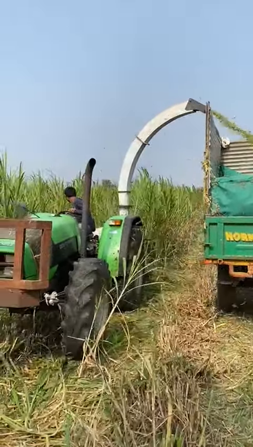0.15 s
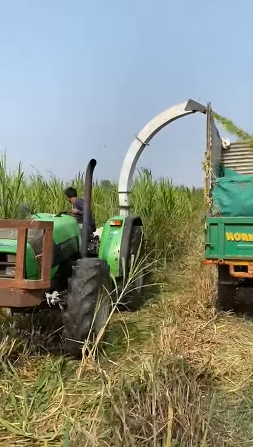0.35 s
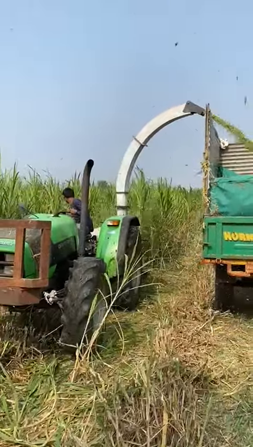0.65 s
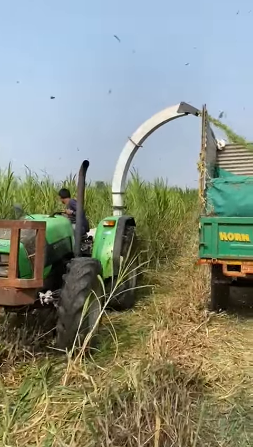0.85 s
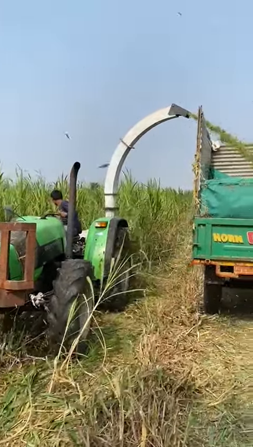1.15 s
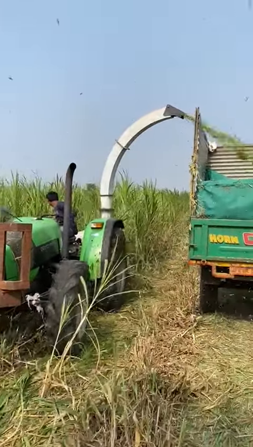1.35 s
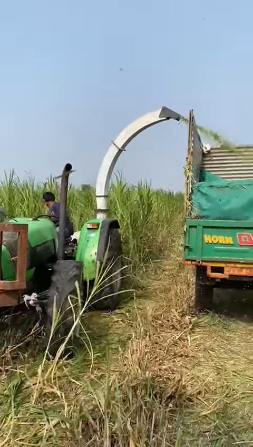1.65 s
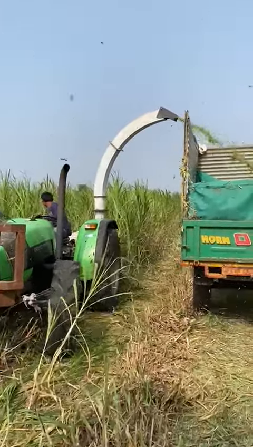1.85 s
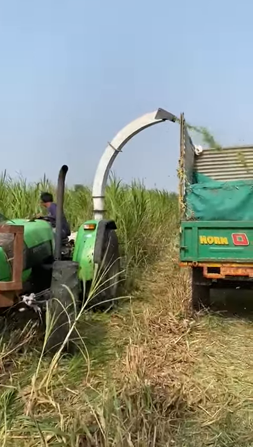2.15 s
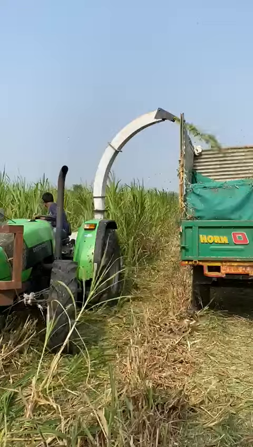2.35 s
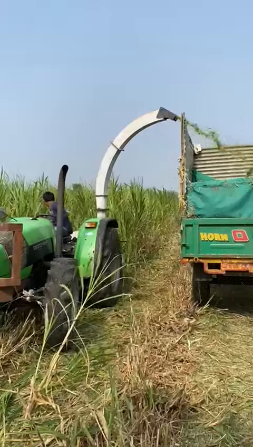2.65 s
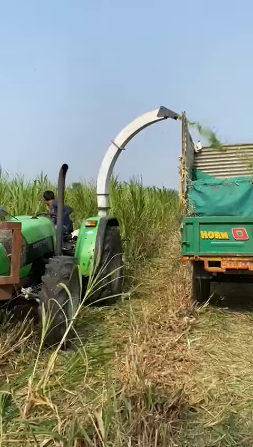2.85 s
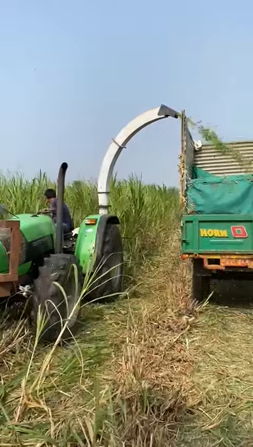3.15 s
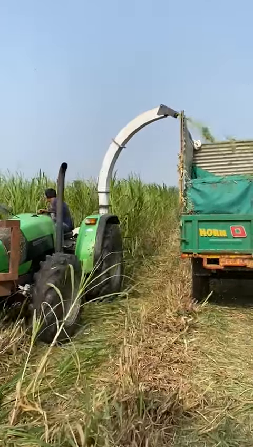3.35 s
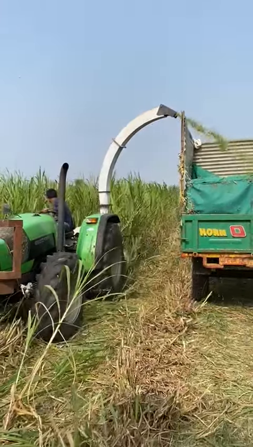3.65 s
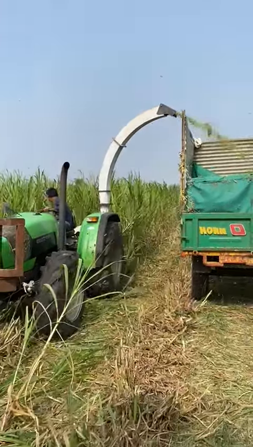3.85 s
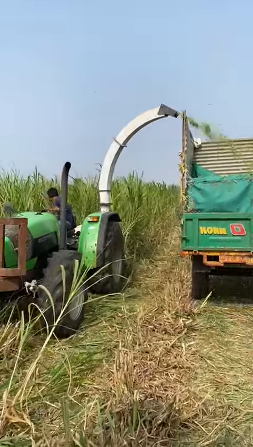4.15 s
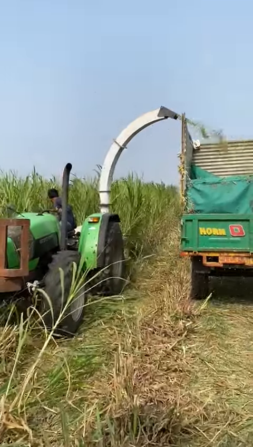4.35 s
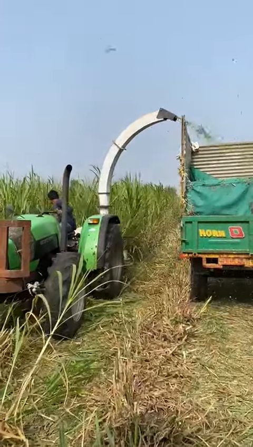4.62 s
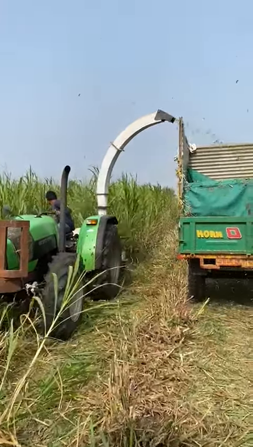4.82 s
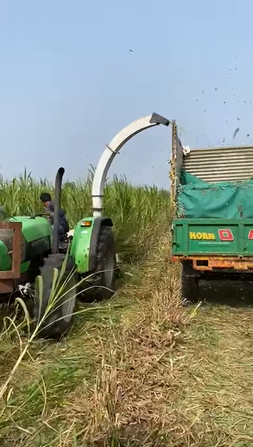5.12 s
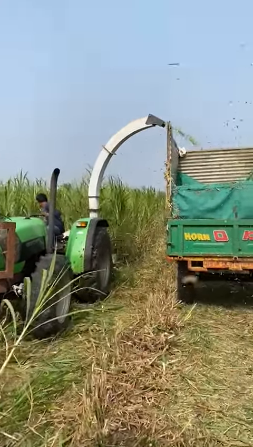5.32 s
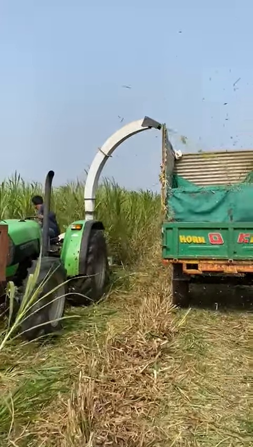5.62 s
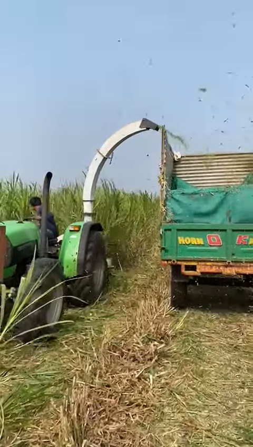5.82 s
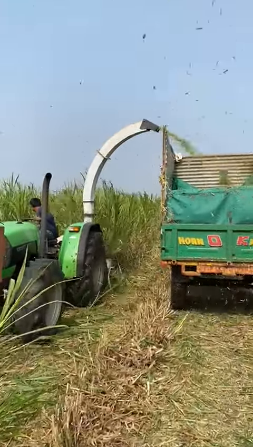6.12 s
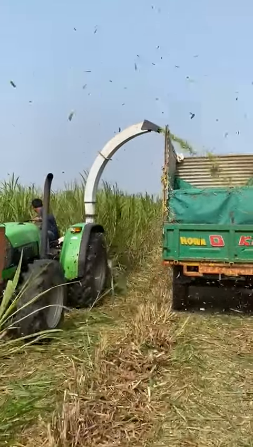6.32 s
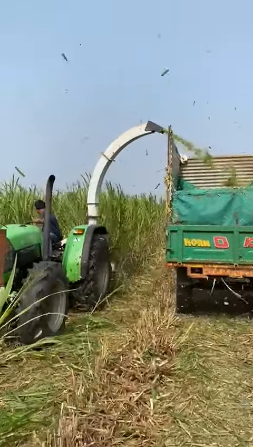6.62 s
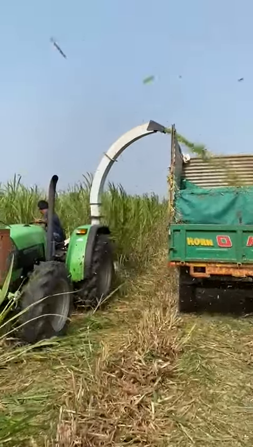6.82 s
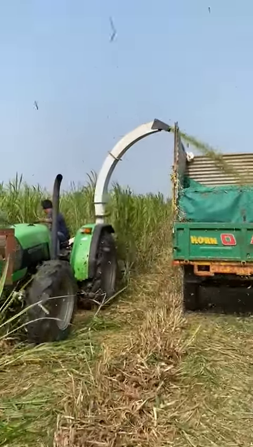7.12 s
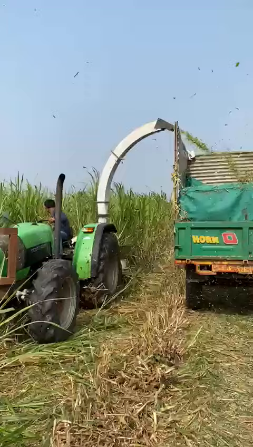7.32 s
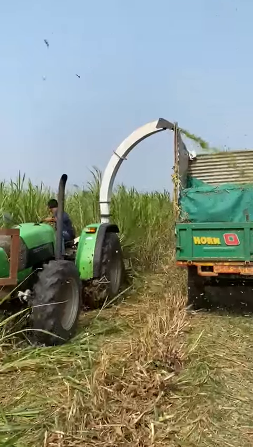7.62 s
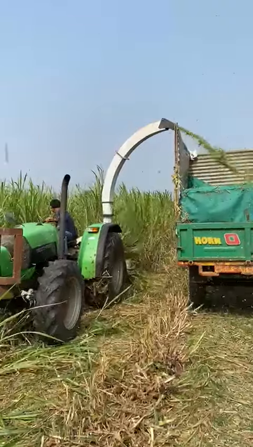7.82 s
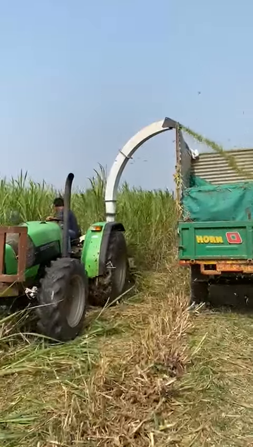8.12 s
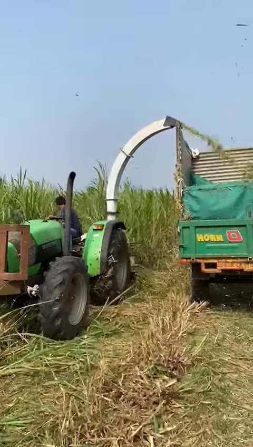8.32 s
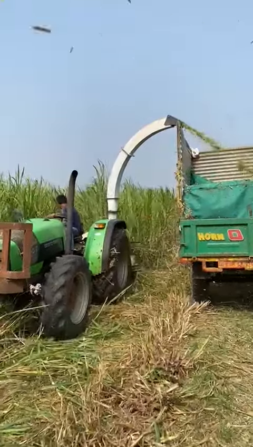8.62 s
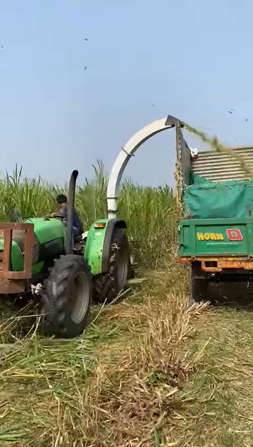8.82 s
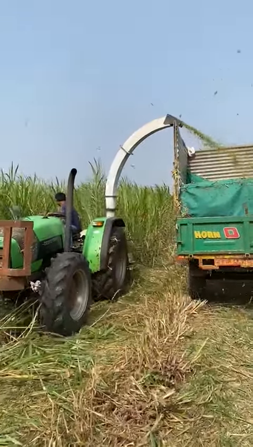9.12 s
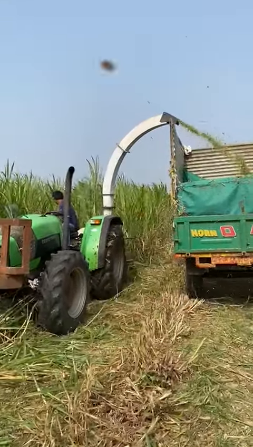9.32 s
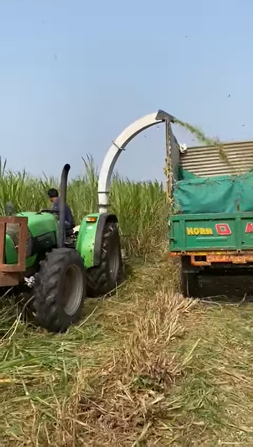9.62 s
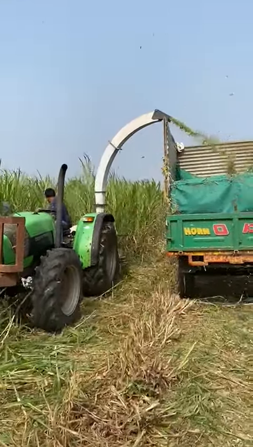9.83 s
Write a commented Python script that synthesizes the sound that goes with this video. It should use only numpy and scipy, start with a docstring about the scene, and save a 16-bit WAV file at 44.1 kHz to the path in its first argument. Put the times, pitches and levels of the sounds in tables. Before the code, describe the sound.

A diesel tractor runs under load a few metres away in an open field, its pitch easing and sagging slightly as its exhaust beats against a second tractor. Throughout, a forage harvester chops grass in lumpy surges, a blower hisses and chaff rattles up a metal spout. Hard stalks crack and knock in clusters, early on, near the middle and again about two thirds through.

```python
"""An open field of tall grass, a few metres from a four-cylinder diesel tractor and its forage harvester.
The engine eases and sags with the crop, and its exhaust beats against a second one hauling the trailer.
Knives chop the stalks in surges, loose bits tap the guards, and a blower hisses.
Chaff rattles up a ringing sheet-metal spout, where hard stalks crack and knock."""
import sys
import numpy as np
from scipy import signal
from scipy.fft import rfft, irfft, next_fast_len
from scipy.io import wavfile

SR = 44100
rng = np.random.default_rng(int(sys.argv[2]) if len(sys.argv) > 2 else 0)


def int16_out(signal):
    """Quantize to a 16-bit WAV file."""
    q = np.round(np.clip(np.atleast_2d(signal).T, -1, 1) * 32767)
    wavfile.write(sys.argv[1], SR, q.astype(np.int16))


N = 439677
T = np.arange(N) / SR
FFT_SIZE = next_fast_len(N)
HZ = np.fft.rfftfreq(FFT_SIZE, 1 / SR)

# The near tractor's speed. Each row: time in seconds, firings per second.
TRACTOR_SPEED = [(0, 68.1), (0.85, 66.45), (1.3, 66.75), (2.15, 66.95), (2.6, 67.7), (3.3, 68.35),
                 (3.95, 69.0), (5.0, 71.75), (5.35, 72.45), (5.8, 72.6), (6.2, 72.3), (6.9, 70.7),
                 (7.45, 70.6), (9.1, 68.75), (9.7, 69.0)]
# Its exhaust tones at 1, 2, 3 (the boom) and 8 times the firing rate.
# Each row: time in seconds, level in dB.
FIRING_TONE = [(0, -30), (2.2, -30), (3.7, -27.5), (4.3, -30.5), (5.8, -30), (6.7, -33.5), (8.2, -32),
               (8.75, -28), (9.8, -34.5)]
SECOND_TONE = [(0, -37.5), (4.5, -39), (6.3, -32), (7.7, -32), (8.5, -34.5), (9.97, -32.5)]
BOOM_TONE = [(0, -30), (0.45, -23.5), (1.6, -28.5), (3.8, -24), (4.85, -30.5), (6.6, -24), (7.9, -27),
             (8.75, -26), (9.97, -31.5)]
EIGHTH_TONE = [(0, -36), (.8, -37.5), (1.6, -47), (2.0, -35), (2.6, -37), (3.0, -45), (3.8, -51),
               (4.15, -35.5), (4.9, -35.5), (5.8, -38), (6.3, -48), (8.6, -47), (9.2, -39), (9.97, -45)]
# Its other tones; the quarter multiples come from unequal cylinders.
# Each row: multiple of the firing rate, level in dB before the pipe lifts it.
TRACTOR_TONES = [(.75, -47.5), (1.25, -47), (1.5, -44.5), (3.75, -48), (4, -33), (4.25, -51), (5, -43.5),
                 (6, -47.5), (7, -45.5), (9, -48), (10, -45.5), (12, -50)]
# Exhaust pipe resonances. Each row: centre in Hz, width in Hz, lift in dB.
PIPE_MODES = [(267, 5.3, 3), (289.1, 10.5, 8.3), (362, 6, 5), (435, 8, 6), (465, 4, 6), (479, 11, 9),
              (615, 10, 7), (850, 30, 6)]
# The hauling tractor's near-steady speed. Each row: time in seconds, firings per second.
HAULER_SPEED = [(0, 68.5), (1.3, 68.4), (4.0, 68.4), (5.4, 68.85), (7.3, 68.5), (9.97, 68.3)]
# Its exhaust tones. Each row: multiple of the firing rate, dB against the hauler's level.
HAULER_TONES = [(.75, -19), (1, -8), (1.75, -9), (2, 1.7), (2.25, -13), (2.5, -19), (4.25, -14.5),
                (5.25, -11.5), (6, -17), (10, -9.5), (10.5, -15.5)]
# Two faint whines. Each row: time in seconds, lower whine in dB, higher whine in dB.
WHINE_LEVELS = [(0, -35.5, -56), (2.6, -42, -56), (3.3, -41.5, -47), (4.8, -41, -43.5), (5.4, -43, -56),
                (6.5, -47, -56), (9.97, -47, -54)]
# The machinery's roar and the blower's hiss. Each row: time in seconds, level in dB.
ROAR_LEVEL = [(0.05, -27), (0.42, -29), (3.45, -29.5), (4.8, -31.5), (5.42, -27.5), (5.61, -27.5),
              (9.09, -27.5), (9.6, -27.5)]
BLOWER_LEVEL = [(0.1, -46), (0.6, -48.1), (1.2, -48.5), (1.9, -45.6), (2.4, -49), (3.3, -46.5),
                (4.8, -50.5), (5.05, -46.6), (5.45, -44.5), (5.7, -45), (7.45, -46), (7.7, -43.5),
                (9.05, -45.5), (9.65, -48), (9.9, -47)]
# Even flow of crop through the knives. Each row: time in seconds, flow level in dB.
EVEN_FEED = [(0, -28), (1.1, -29), (2.25, -27.5), (2.7, -29.5), (3.4, -28), (4.35, -29), (4.75, -30.5),
             (5.2, -29.5), (6.4, -26.5), (7.15, -29), (7.55, -28.5), (8.65, -27), (9.4, -28.5), (9.97, -29)]
# Thick wads of grass on top of that flow.
# Each row: start in seconds, hold in seconds, extra dB at the knives, extra dB at the spout.
GRASS_WADS = [(0.79, 0.041, 1.5, 0), (1.177, 0.96, 2.5, 0.5), (1.52, 0.073, 1, 3.5),
              (3.117, 0.047, 0.5, 2.5), (3.51, 0.13, 2, 2), (3.937, 0.081, 2.5, 3), (4.215, 0.1, 3, 1),
              (6.537, 0.06, 3, 2), (6.713, 0.5, 3, 1), (6.735, 0.14, 1.5, -1), (7.96, .08, 1.5, 2.5)]
# Tone colour of roar, knives, blower and cracking stalks. Each row: frequency in Hz, relative level in dB.
ROAR_EQ = [(20, -23), (40, -22), (55, -16), (85, -1.5), (110, -15.5), (160, 3.5), (250, -1), (390, 2.5),
           (490, -0.9), (600, 2), (710, -1.3), (790, -4.5), (1400, -11.5), (2600, -11.5), (3300, -19.5),
           (6000, -24), (12000, -100)]
CHOP_EQ = [(300, -20), (700, -3), (1000, 1), (1400, 0), (1900, -2), (2250, -5), (2500, -9), (3300, -15),
           (4200, -15), (5500, -21), (6000, -21), (9000, -36), (12000, -42)]
BLOWER_EQ = [(1000, -9), (2200, 1), (2800, 9), (3400, 5), (4500, 6), (5200, 7.5), (6600, 6), (8000, 3.3),
             (9200, -.5), (11000, .3), (12000, -2.5)]
CRACK_EQ = [(600, -14), (1200, -1), (1900, 1), (2600, -8), (3300, -14), (5500, -14), (8000, -25),
            (12000, -40)]
# Spout resonances: soft chaff rings the low ones, coarse pieces reach the high ones.
# Each row: centre in Hz, width in Hz, relative level in dB.
SPOUT_LOW_MODES = [(1400, 200, -11), (2165, 150, 0)]
SPOUT_HIGH_MODES = [(3650, 350, -8), (4150, 280, 0), (5000, 250, -3)]
# Hard stalks, each striking its own part of the spout.
# Each row: start in seconds, ring in dB, crack in dB before its EQ, knock in dB, knock pitch in Hz.
STALK_HITS = [(0.1456, -35, -33, -38, 4180), (1.183, -26, -37, -42, 4200), (1.205, -30, -31, -42, 4080),
              (1.352, -38, -28, -37, 4170), (1.468, -37, -46, -37.5, 4100), (1.495, -28, -39, -38, 4180),
              (1.54, -32, -41, -36, 4350), (1.575, -29, -36, -38, 4200), (1.617, -30, -39, -40, 4150),
              (1.745, -38, -48, -36, 4100), (1.766, -30, -44, -40, 4280), (1.815, -27, -46, -41, 4050),
              (1.86, -30, -34, -39, 4300), (1.879, -27, -31, -33, 4080), (1.905, -29, -34, -40, 4200),
              (1.982, -26, -48, -38, 4250), (2.068, -29, -28, -43, 5050), (2.15, -28, -44, -50, 4200),
              (3.13, -44, -43, -37, 4180), (3.553, -32, -46, -44, 4300), (3.585, -38, -38, -52, 4200),
              (3.624, -32, -46, -52, 4200), (3.937, -23, -31.5, -38, 5000), (3.972, -33, -42, -46, 4200),
              (4.045, -30, -48, -45, 4200), (4.209, -28, -31.5, -32.5, 4140), (4.253, -37, -36, -46, 5000),
              (4.439, -31, -40, -39, 4250), (5.42, -42, -31, -33, 4130), (5.441, -32, -34, -39, 4750),
              (5.523, -44, -48, -39, 5230), (6.04, -28, -45, -46, 4100), (6.448, -35, -38, -32, 4000),
              (6.5685, -34, -45, -42, 4400), (6.742, -25, -27, -35, 4380), (6.761, -33, -37, -37, 5650),
              (6.797, -36, -32, -40, 4450), (6.866, -32, -29, -34.5, 4330), (7.034, -29, -34, -48, 4200),
              (7.108, -35, -39, -39, 5200), (7.162, -34, -39, -46, 4300), (7.32, -33, -38, -50, 4200),
              (7.97, -29, -36, -44, 4200), (8.24, -34, -41, -46, 4200), (8.998, -33, -41, -46, 4200)]
# Stereo width. Each row: frequency in Hz, likeness of left and right from 0 to 1.
STEREO_LIKENESS = [(60, .8), (150, .8), (300, .86), (600, .95), (800, .9), (1100, .95), (1750, .998),
                   (2550, .99), (2850, .7), (3350, .1), (3950, .52), (4550, .26), (4720, .72), (5000, .92),
                   (5300, .965), (5560, .87), (5750, .68), (6200, .68), (6600, .995), (8200, .995),
                   (8900, .42), (9600, .995)]
# Stereo phase. Each row: frequency in Hz, lead of the left side in radians.
LEFT_LEAD = [(300, 0), (800, -.25), (1100, -.05), (1400, 0), (2600, 0), (3100, -.7), (3600, 1), (4400, 1.6),
             (4700, .05), (5150, 0), (5600, .4), (6200, 2), (6450, 3.1), (8200, 3.2), (8800, 3.8),
             (9100, 5.9), (9600, 6.28)]
# Stereo balance. Each row: frequency in Hz, left minus right in dB.
BALANCE = [(250, 0), (500, -2), (700, -.6), (900, -4.3), (1100, -2.6), (1800, 0), (2200, .4), (2550, -.5),
           (2800, -3.6), (3100, -4.3), (3400, -1.8), (4100, -1.7), (4550, -2.4), (5000, 0)]


def amp(db):
    """Decibels to gain."""
    return 10 ** (np.asarray(db) / 20)


def unit(x):
    """Scales to rms 1."""
    return x / np.sqrt(np.mean(x ** 2) + 1e-20)


def curves(rows):
    """Each column after the first as a curve over time."""
    s, *columns = np.transpose(rows)
    return [np.interp(T, s, c) for c in columns]


def over_hz(points):
    """Joins points on a log-frequency axis."""
    hz, value = np.transpose(points)
    return np.interp(np.log(HZ + 1), np.log(hz + 1), value)


def wander(rate_hz, size=4096):
    """Smooth random drift of rms 1, up to about the given rate."""
    lowpass = 1 / (1 + (np.fft.rfftfreq(size, T[-1] / size) / rate_hz) ** 4)
    slow = irfft(rfft(rng.standard_normal(size)) * lowpass)
    return unit(np.interp(T, np.linspace(0, T[-1], size), slow))


def impacts(per_s, spread_db):
    """Two unrelated trains of random clicks of uneven size."""
    size = amp(spread_db * rng.exponential(1, (2, N)).clip(0, 4))
    return unit(size * rng.standard_normal((2, N)) * (rng.random((2, N)) < per_s / SR))


def colour(x, gain, lo_hz, hi_hz):
    """Spectrum of x through an EQ that gives unit noise an rms of 1 within the band."""
    share = np.mean(gain ** 2 * (HZ > lo_hz) * (HZ < hi_hz))
    return rfft(x, FFT_SIZE) * gain / np.sqrt(share)


def crank(rate_hz, jitter):
    """Running count of cycles at a speed that trembles slightly."""
    return np.cumsum(rate_hz * (1 + jitter * wander(8.9))) / SR


def pipe_db(hz):
    """The exhaust pipe lifts any tone that the speed carries into one of its resonances."""
    return sum(db / (1 + (2 * (hz - centre) / width) ** 2) for centre, width, db in PIPE_MODES)


def exhaust(firings, tones, rough, fading=0.11):
    """Tones locked to the four-stroke cycle; combustion varies, and the higher ones fade in and out."""
    out = np.zeros(N)
    for multiple, db in tones:
        fade_db = fading * multiple * wander(1.0)
        out += amp(db + fade_db) * np.sqrt(2) * np.cos(2 * np.pi * (multiple * firings + rng.random()))
    return out * (1 + rough * wander(64))


def tractor():
    """The near diesel booms through its pipe; returns the sound and the firing count."""
    rate = curves(TRACTOR_SPEED)[0]
    firings = crank(rate, jitter=.0013)
    tones = [(multiple, db + pipe_db(multiple * rate)) for multiple, db in TRACTOR_TONES]
    for multiple, levels in (1, FIRING_TONE), (2, SECOND_TONE), (3, BOOM_TONE), (8, EIGHTH_TONE):
        tones.append((multiple, curves(levels)[0]))
    return exhaust(firings, tones, rough=0.08), firings


def hauler(start_db=-31.5, rise_db_per_s=0.2755):
    """The second, rougher exhaust swells slowly, close enough in pitch to beat against the first."""
    firings = crank(curves(HAULER_SPEED)[0], jitter=0.0011)
    return amp(start_db + rise_db_per_s * T) * exhaust(firings, HAULER_TONES, rough=0.18)


def whines(pitches_hz=(321.5, 803)):
    """Two faint, wavering tones among the machines."""
    return sum(amp(db + wander(1.5)) * np.sqrt(2) * np.sin(2 * np.pi * crank(hz, jitter=0.0022))
               for hz, db in zip(pitches_hz, curves(WHINE_LEVELS)))


def roar(firings, firing_depth=0.045, cycle_depth=0.029):
    """Combustion and gear noise, throbbing with each firing and each four-stroke cycle."""
    throb = 1 + firing_depth * np.cos(2 * np.pi * firings) + cycle_depth * np.cos(np.pi * firings / 2)
    level = amp(curves(ROAR_LEVEL)[0] + 0.38 * wander(30))
    return colour(rng.standard_normal((2, N)) * unit(throb) * level, amp(over_hz(ROAR_EQ)), 380, 780)


def crop_flow(attack_s=0.0099, release_s=0.014, spout_offset_db=-6):
    """Flow in dB at the knives and at the spout: each wad bites quickly, holds and clears."""
    chopping = drumming = curves(EVEN_FEED)[0]
    for start, hold, chop_db, drum_db in GRASS_WADS:
        bite = np.clip((T - start) / attack_s, 0, 1)
        wad = bite * np.exp(-np.maximum(T - start - hold, 0) / release_s)
        chopping = chopping + chop_db * wad
        drumming = drumming + drum_db * wad
    return chopping, drumming + spout_offset_db


def crop_gain(flow_db, empty_db):
    """Gain of what the crop adds to the sound of the empty machine; it never quite falls silent."""
    added = amp(flow_db) ** 2 - amp(empty_db) ** 2
    return np.sqrt(np.maximum(added, amp(empty_db) ** 2 / 10))


def chopper(flow_db):
    """Thousands of stalks snap under the knives, in lumpy surges."""
    level = crop_gain(flow_db, empty_db=-32) * amp(-2 + 1.86 * wander(13))
    snaps = impacts(per_s=8000, spread_db=1) * level
    return colour(snaps, amp(over_hz(CHOP_EQ)), 900, 2000)


def panels(flow_db, taps_per_s=300, t60_s=.08, low_hz=800, high_hz=2800, trim_db=-6.5):
    """Loose bits of crop tap guards and covers, each at its own pitch; the high ones ring more softly."""
    t = T[:SR // 12]
    decay = amp(-60 * t / t60_s)
    taps = np.zeros((2, N + len(t)))
    for train in taps:
        for when, pitch, size in rng.random((round(taps_per_s * T[-1]), 3)):
            hz = low_hz * (high_hz / low_hz) ** pitch
            start = int(when * N)
            strength = np.sign(size - .5) * (1 + abs(2 * size - 1)) / (1 + (hz / 2100) ** 4)
            train[start:start + len(t)] += strength * decay * np.sin(2 * np.pi * hz * t)
    return rfft(unit(taps[:, :N]) * crop_gain(flow_db, empty_db=-36) * amp(trim_db), FFT_SIZE)


def reflections(strength=0.29, longest_s=.028, dull_hz=3000, count=12):
    """Ground, bodywork and trailer wall send back short, dull echoes that ripple the noise spectrum."""
    delays = rng.uniform(longest_s / 10, longest_s, count)
    echoes = np.exp(-2j * np.pi * delays[:, None] * HZ).sum(0) / np.sqrt(count)
    returned = strength / (1 + (HZ / dull_hz) ** 2)
    return (1 + returned * echoes) / np.sqrt(1 + returned ** 2)


def blower(gust_db=0.6):
    """Air and fine chaff rush out of the spout in small gusts."""
    level = amp(curves(BLOWER_LEVEL)[0] + gust_db * wander(22))
    rush = impacts(per_s=22000, spread_db=-2) * level
    return colour(rush, amp(over_hz(BLOWER_EQ)), 8800, 11300)


def spout_wall(x, modes, lo_hz, hi_hz, dull_hz=5230):
    """Spectrum of x ringing in the sheet metal, which radiates little above dull_hz."""
    gain = sum(amp(db) / (1 + 1j * (HZ ** 2 - hz ** 2) / (width * HZ + 1e-9)) for hz, width, db in modes)
    gain = gain / (1 + (HZ / dull_hz) ** 6)
    return colour(x, abs(gain), lo_hz, hi_hz) * np.exp(1j * np.angle(gain))


def spout(flow_db, soft_db=-3, rasp_db=-9):
    """Chaff drums on the spout wall, and coarse pieces rasp on it in flurries."""
    drumming = crop_gain(flow_db, empty_db=-36)
    soft = impacts(per_s=2400, spread_db=-1.5) * drumming * amp(soft_db + 2 * wander(26))
    coarse = impacts(per_s=220, spread_db=-1) * drumming * amp(rasp_db + 3.5 * wander(15))
    return spout_wall(soft, SPOUT_LOW_MODES, 2030, 2330) + spout_wall(coarse, SPOUT_HIGH_MODES, 3500, 4450)


def splinters(decay_s, per_s=1500, size=6000):
    """A stalk shatters: a burst of small irregular clicks that starts at once and dies away."""
    clicks = rng.standard_normal((2, size)) * (rng.random((2, size)) < per_s / SR)
    return clicks * np.exp(-T[:size] / decay_s)


def at_level(x, db, decay_s):
    """Gives a burst the energy of this level held for decay_s."""
    return amp(db) * x * np.sqrt(decay_s * SR / (np.sum(x ** 2, axis=1, keepdims=True) + 1e-20))


def struck(hz, db, width_hz, decay_s):
    """Splinters ring one patch of the sheet metal."""
    band = signal.butter(2, [hz - width_hz / 2, hz + width_hz / 2], "bandpass", fs=SR)
    return at_level(signal.lfilter(*band, splinters(decay_s)), db, decay_s)


def stalks(spout_hz=2170, scatter=.025, crack_s=.03):
    """Each hard stalk cracks, rings the spout near its main pitch and knocks a higher resonance."""
    rings, cracks = np.zeros((2, 2, N + SR))
    for start, ring_db, crack_db, knock_db, knock_hz in STALK_HITS:
        ring_hz = spout_hz * (1 + scatter * rng.uniform(-0.9, 1))
        ring = struck(ring_hz, ring_db, width_hz=190, decay_s=.017)
        knock = struck(knock_hz, knock_db, width_hz=340, decay_s=.021)
        span = slice(round(start * SR), round(start * SR) + ring.shape[1])
        rings[:, span] += ring + knock
        cracks[:, span] += at_level(splinters(crack_s), crack_db, crack_s)
    return rfft(rings[:, :N], FFT_SIZE) + colour(cracks[:, :N], amp(over_hz(CRACK_EQ)), 1500, 6000)


def scene():
    """Mixes the layers as spectra and spreads them between left and right."""
    near_exhaust, firings = tractor()
    tones = rfft(near_exhaust + hauler() + whines(), FFT_SIZE)
    chopping_db, drumming_db = crop_flow()
    machinery = (roar(firings) + chopper(chopping_db) + panels(chopping_db)) * reflections()
    # the spout stands high and clear, so its sounds get no echoes
    shared, apart = machinery + blower() + spout(drumming_db) + stalks()
    like = np.clip(over_hz(STEREO_LIKENESS), 0, 1)
    left = shared + tones
    right = (like * shared + np.sqrt(1 - like ** 2) * apart + tones) * np.exp(-1j * over_hz(LEFT_LEAD))
    lean = amp(over_hz(BALANCE) / 2)
    return irfft(np.array([left * lean, right / lean]), FFT_SIZE)[:, :N]


def record(dry):
    """A steep low-pass takes off the top of the treble."""
    cutoff_hz = 11680
    taps = signal.firwin(511, cutoff_hz, window=("kaiser", 9), fs=SR)
    return signal.oaconvolve(dry, taps[None], "same")


dry = scene()
out = record(dry)
int16_out(out)
```